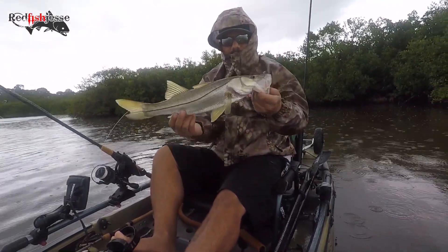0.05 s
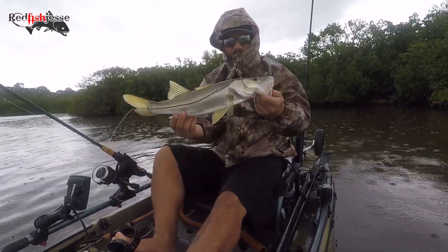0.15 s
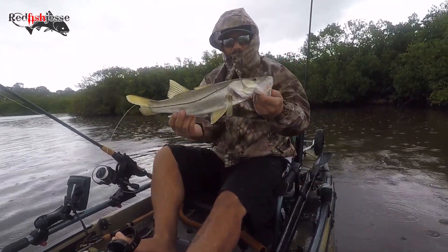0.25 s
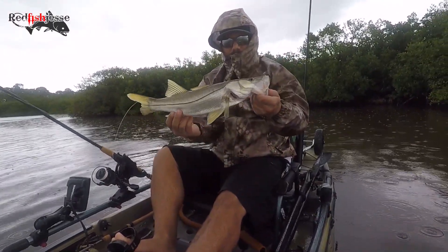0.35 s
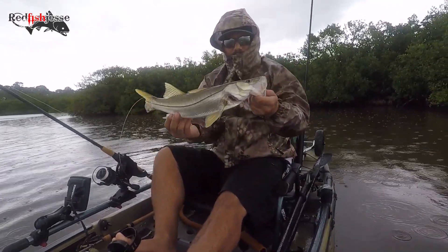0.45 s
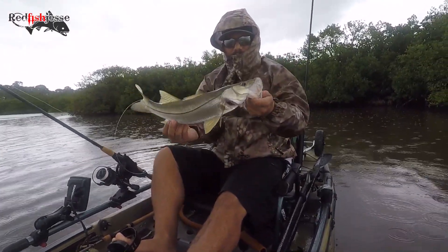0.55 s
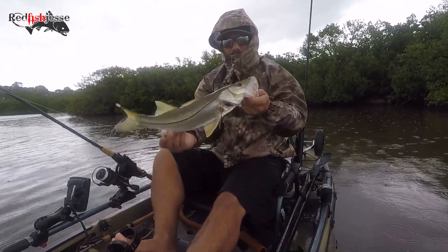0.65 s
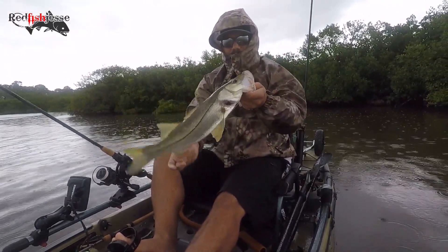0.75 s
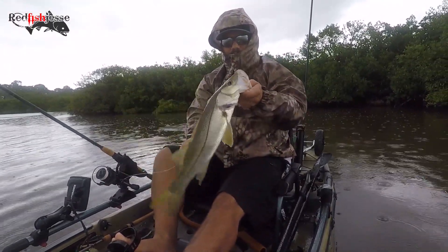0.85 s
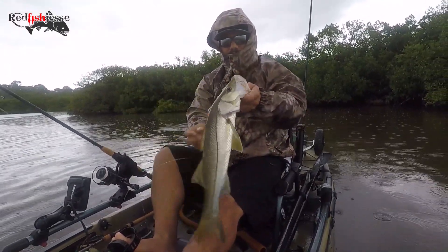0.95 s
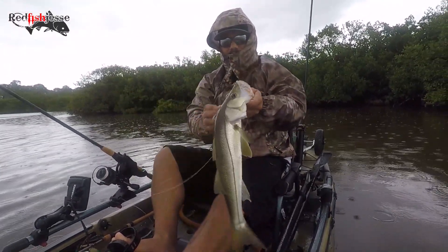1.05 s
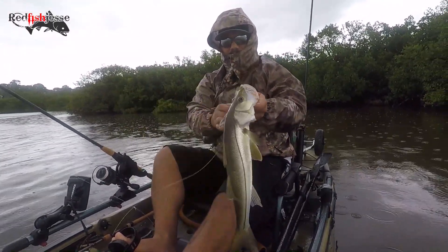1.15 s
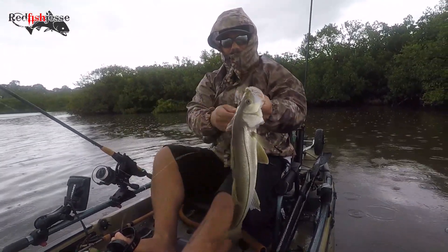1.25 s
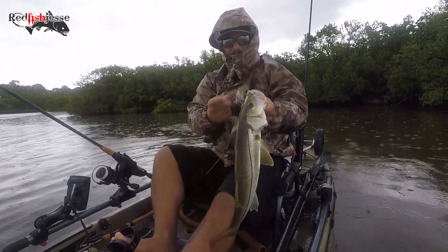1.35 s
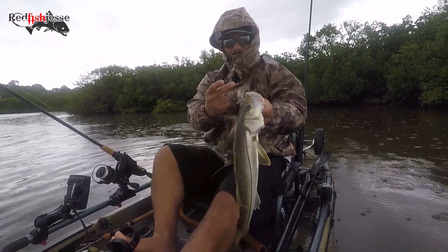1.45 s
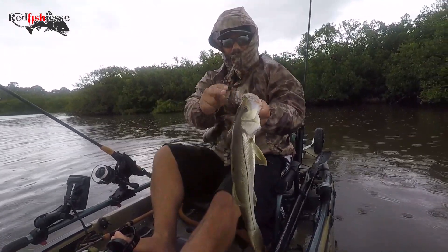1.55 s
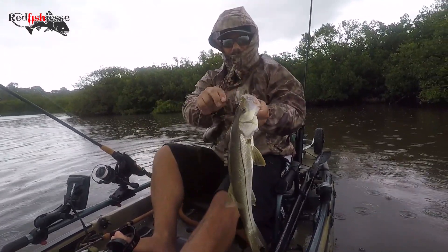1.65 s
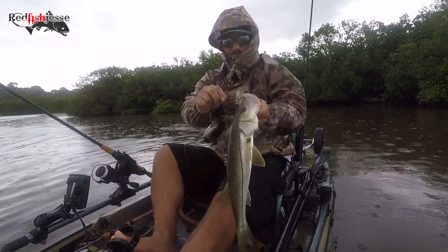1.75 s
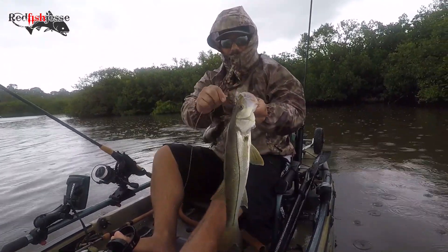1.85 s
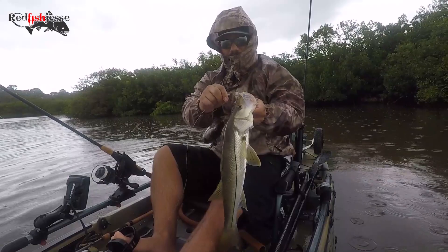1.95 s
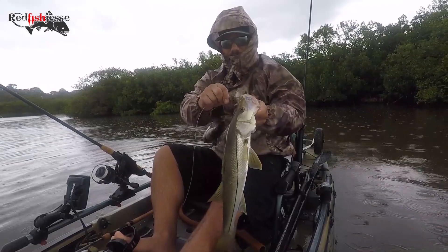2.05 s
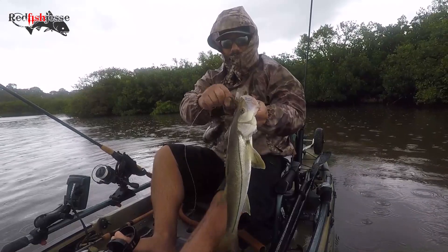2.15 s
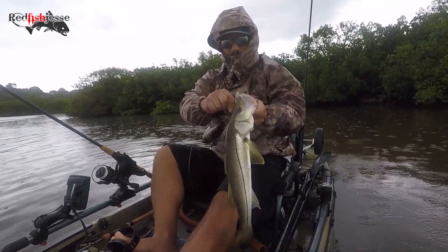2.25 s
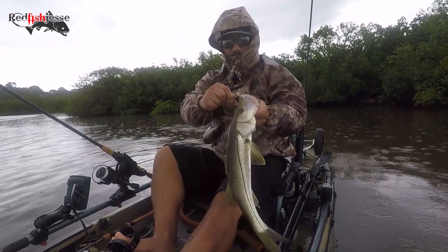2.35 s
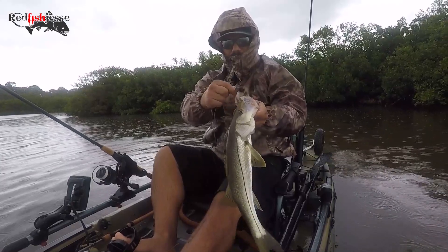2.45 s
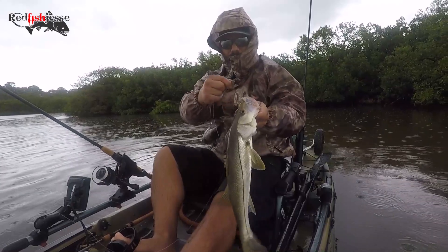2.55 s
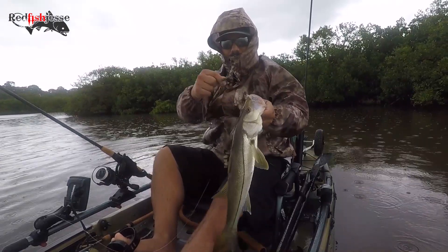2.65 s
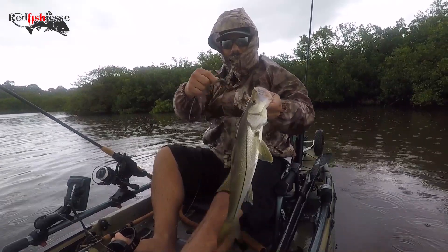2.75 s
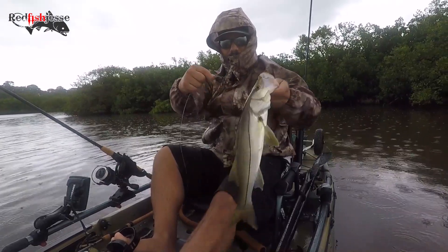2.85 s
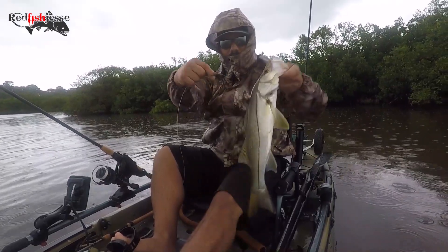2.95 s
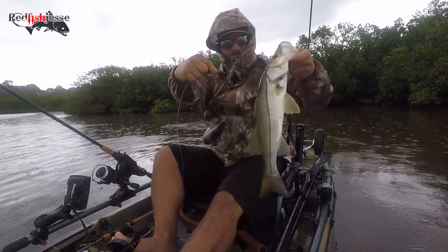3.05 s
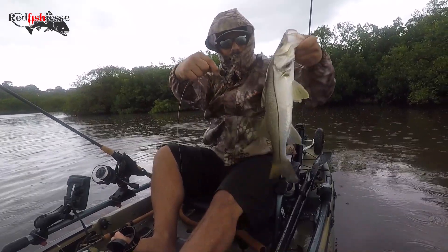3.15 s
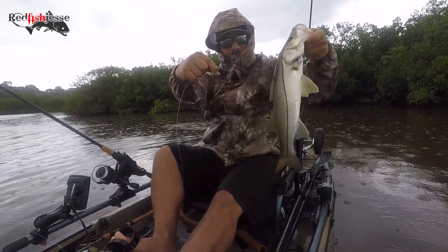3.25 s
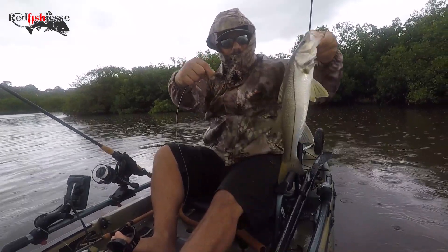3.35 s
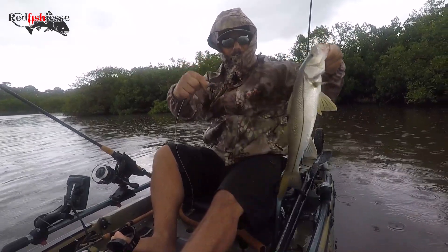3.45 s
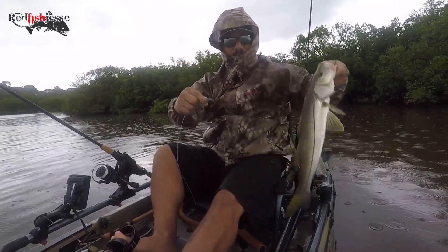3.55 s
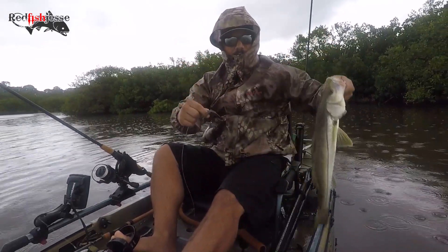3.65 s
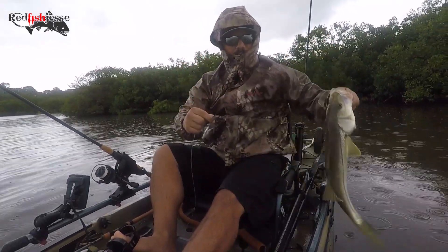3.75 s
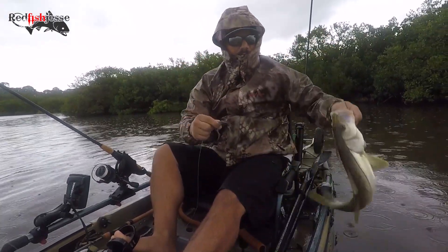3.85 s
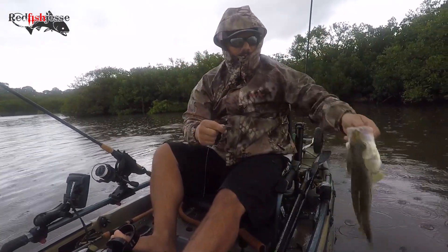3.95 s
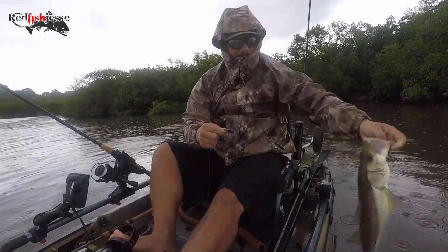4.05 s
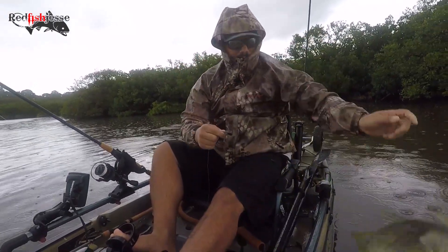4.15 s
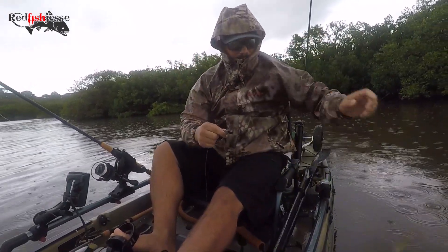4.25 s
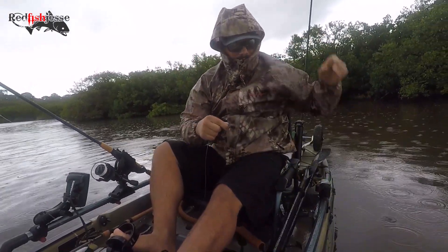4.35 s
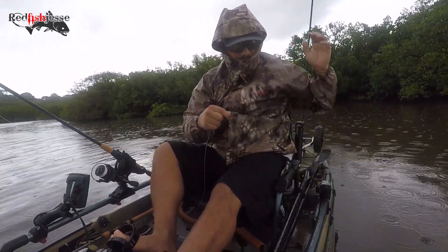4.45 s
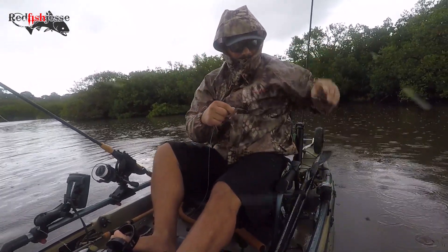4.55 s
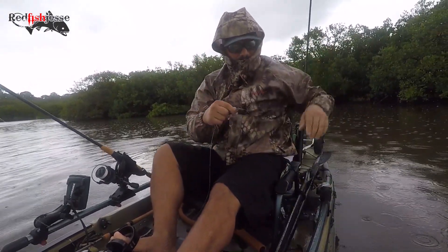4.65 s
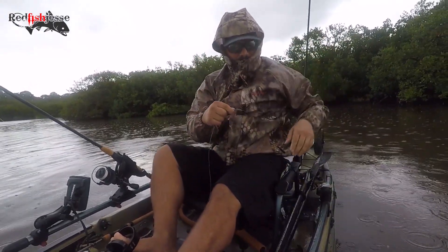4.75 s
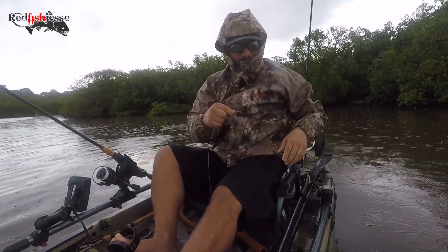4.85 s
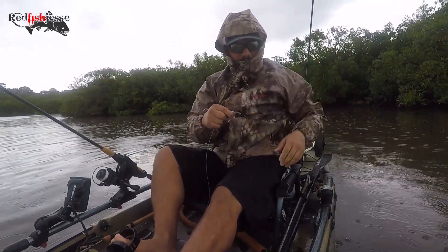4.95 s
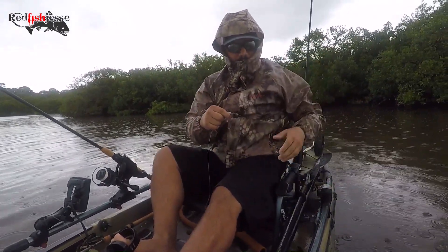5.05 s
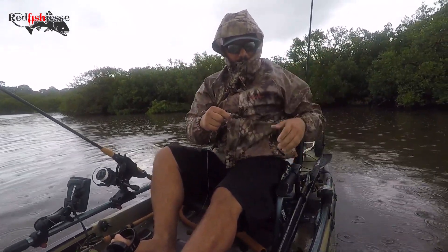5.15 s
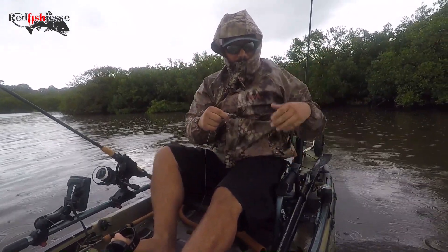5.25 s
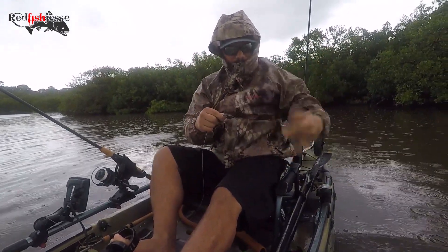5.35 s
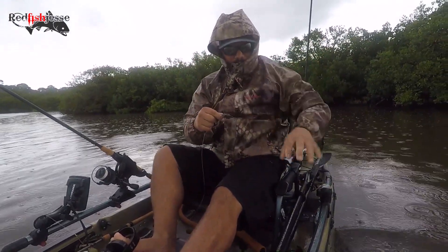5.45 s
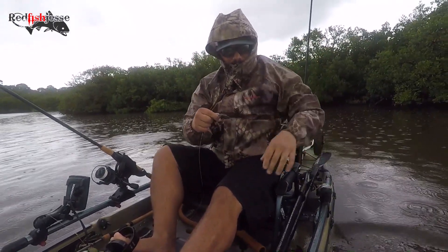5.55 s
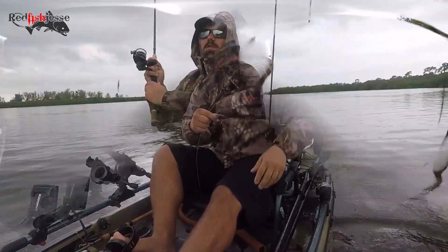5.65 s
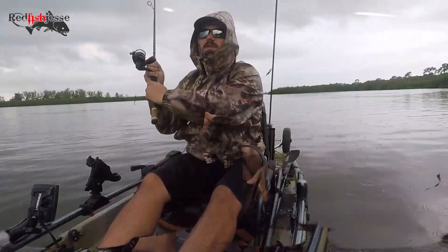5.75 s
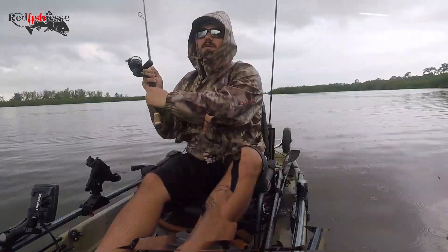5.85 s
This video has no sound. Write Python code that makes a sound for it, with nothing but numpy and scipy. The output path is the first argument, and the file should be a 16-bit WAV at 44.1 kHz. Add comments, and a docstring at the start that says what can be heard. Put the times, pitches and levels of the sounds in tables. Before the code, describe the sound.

Rainfall ticks and drums around a small boat with light knocks, then heavy thumps, a short splash, bubbling, breeze and a final clack.

```python
"""Steady rain on a lagoon, heard on a plastic kayak: wash, ticks and drops that drum modal rings from the hull.
A jacket swishes as filtered noise; knocks ring the hull modes; tackle clacks at 2 s. Near 4 s a fish is let go:
it thumps the boat, slaps the water (noise bursts), throws up spray (grains), and bubbles (climbing sines) rise.
Then the rain fades, the image narrows to the middle, a breeze (filtered noise) rumbles and tackle clacks again."""
import sys
import numpy as np
from scipy import signal
from scipy.fft import rfft, irfft
from scipy.io import wavfile

SR = 44100
rng = np.random.default_rng(int(sys.argv[2]) if len(sys.argv) > 2 else 0)


def log_audio(samples):
    """Write samples as a 16-bit WAV file to the path given in sys.argv[1]."""
    # one column per channel
    frames = np.atleast_2d(samples).T
    # limit to full scale, then quantise
    limited = np.clip(frames, -1, 1)
    pcm = np.round(limited * 32767).astype(np.int16)
    wavfile.write(sys.argv[1], SR, pcm)


N = 260583


def gain_of(db):
    """Decibels to gain."""
    return 10 ** (np.asarray(db) / 20)


def evened(x):
    """Scales to rms 1."""
    return x / np.sqrt(np.mean(x ** 2) + 1e-20)


def read(points, hz):
    """Reads a spectrum table on a log-frequency axis."""
    f, value = np.transpose(points)
    return np.interp(np.log(hz + 1), np.log(f + 1), value)


def level(curve):
    """A (time_s, db) curve as a gain for every sample."""
    return gain_of(np.interp(np.arange(N) / SR, *np.transpose(curve)))


def add(mix, start_s, sound):
    """Lays a sound into the mix at start_s."""
    part = mix[:, max(round(start_s * SR), 0):][:, :sound.shape[-1]]
    part += sound[..., :part.shape[1]]


def colour(x, spectrum):
    """Causal minimum-phase filter with the given (hz, db) response."""
    log_gain = np.log(gain_of(read(spectrum, abs(np.fft.fftfreq(4096, 1 / SR)))))
    taps = np.fft.ifft(np.exp(np.conj(signal.hilbert(log_gain)))).real
    return signal.oaconvolve(x, taps[None, :len(taps) // 2], axes=1)[:, :x.shape[1]]


def lowpass(x, order, edge_hz):
    """Butterworth low-pass."""
    return signal.sosfilt(signal.butter(order, edge_hz, fs=SR, output="sos"), x)


def ports(z, phase, same, pan):
    """Two unrelated sounds become a microphone pair: partly alike, phase-shifted, tilted in level."""
    hz = np.fft.rfftfreq(z.shape[1], 1 / SR)
    a, b = rfft(z)
    likeness = np.clip(read(same, hz), 0, .99)
    tilt = gain_of(read(pan, hz) / 2)
    right = (likeness * a + np.sqrt(1 - likeness ** 2) * b) * np.exp(-1j * read(phase, hz))
    return irfft(np.array([a * tilt, right / tilt]), z.shape[1])


def sway(rate_hz, depth_db):
    """A gain that wanders between random values drawn rate_hz times a second."""
    t = np.arange(N) / SR
    knots = rng.standard_normal(1024)
    return gain_of(depth_db * np.interp(t * rate_hz, np.arange(len(knots)), knots))


def swell(t, crest_s, rise_s, fall_s):
    """An envelope that grows to a crest and dies away, both exponentially."""
    return np.exp(-np.maximum((crest_s - t) / rise_s, (t - crest_s) / fall_s))


def impacts(per_s, spread_db):
    """A random train of impulses, mostly small and a few large."""
    sizes = gain_of(spread_db * np.minimum(rng.exponential(1, N), 4))
    return sizes * (rng.random(N) < per_s / SR)


def strewn(per_s, spread_db, grain):
    """Repeats a stereo grain at random impacts."""
    return signal.oaconvolve(impacts(per_s, spread_db)[None], grain, axes=1)[:, :N]


def patter(per_s, spread_db, low_hz, high_hz, cycles, count=24):
    """Drops of many sizes: each is a short fizzing tick around its own pitch."""
    t, out = np.arange(1024) / SR, np.zeros((2, N))
    for hz in np.geomspace(low_hz, high_hz, count):
        burst = rng.standard_normal((2, len(t))) * np.exp(-t / 0.00098)
        ring = np.sin(2 * np.pi * hz * t) * np.exp(-t * hz / cycles)
        grain = evened(signal.fftconvolve(burst, ring[None], axes=1)[:, :len(t)])
        out += np.sqrt(hz) * strewn(per_s / count, spread_db, grain)
    return out


def plink(hz, cycles, rise):
    """Trapped air rings as a decaying sine that climbs while it nears the surface."""
    t = np.arange(SR // 15) / SR
    age = t * hz / cycles
    turns = np.cumsum(hz * (1 + rise * np.minimum(age, 5))) / SR
    ring = np.sin(2 * np.pi * (turns + rng.random((2, 1))))
    return ring * np.exp(-age) * (1 - np.exp(-t * hz))


def bubbles(per_s, spread_db, low_hz, high_hz, cycles, rise, count=24):
    """A random swarm of bubbles of many sizes."""
    sizes_hz = np.geomspace(low_hz, high_hz, count)
    return evened(sum(strewn(per_s / count, spread_db, plink(hz, cycles, rise)) for hz in sizes_hz))


# rain strength: time_s, gain_db
RAIN_LEVEL = [(0, -0.5), (2.3, -0.5), (4.1, 1.64), (4.6, -5.5), (4.9, -5), (5.1, -22), (5.3, -6.5),
              (5.91, -28)]
# filters of far wash and near drops: freq_hz, relative_db
WASH_COLOUR = [(60, -104), (130, -19), (350, 21.5), (560, 8), (900, -14), (1500, -4.5), (2100, -9.5),
               (3000, -11.5), (4400, -6), (6000, -3.5), (7700, -9), (10000, -14.5), (12500, -20),
               (15000, -42)]
DROP_COLOUR = [(200, -40.5), (600, 8), (1100, 2.5), (2000, -8), (2900, 0), (4300, -11.5), (5900, 0),
               (7700, -10.5), (10000, -10), (12500, -28), (15000, -25)]
# rain at the two microphone ports: freq_hz, left_lead_rad | freq_hz, likeness | freq_hz, left_minus_right_db
RAIN_LEAD = [(100, -5), (500, -2.5), (1500, -4), (2200, -5), (3300, -5), (4600, -7.5), (5400, -8),
             (7400, -8.5), (10000, -11.5), (15000, -7.5)]
RAIN_LIKENESS = [(100, 0.25), (350, 0.93), (700, 0.56), (1500, 0.31), (2200, 0.74), (3300, 1), (6000, 0.95),
                 (9000, 0.5), (15000, .1)]
RAIN_BALANCE = [(200, -0.5), (700, -1), (1400, 0.5), (3000, -1), (6000, 0.5), (8500, -7.5), (15000, -4.5)]


def rain():
    """A far wash, nearer ticks and plinks on the water, and drops drumming on the hull."""
    wash = gain_of(-41.5) * evened(colour(rng.standard_normal((2, N)), WASH_COLOUR))
    wash *= sway(rate_hz=70, depth_db=1)
    near = patter(per_s=3200, spread_db=2.9, low_hz=600, high_hz=13000, cycles=2.2)
    drops = gain_of(-45.5) * evened(colour(near, DROP_COLOUR))
    plinks = bubbles(per_s=69, spread_db=0.0, low_hz=1774, high_hz=4430, cycles=17, rise=0.038)
    plinks *= gain_of(-63.0) * sway(rate_hz=9.2, depth_db=6.5)
    # one independent train, each with its own ring, per entry of the mode table
    drumming = sum(strewn(22, 1.0, hull_ring(hard_hz=311.4, twist=0.6)) for _ in HULL_MODES)
    on_water = ports(wash + drops + plinks, RAIN_LEAD, RAIN_LIKENESS, RAIN_BALANCE)
    return level(RAIN_LEVEL) * (on_water + gain_of(-34.0) * evened(drumming))


# largest close drops on boat and gear: start_s, level_db, pitch_hz, left_minus_right_db
LARGE_DROPS = [(0.316, -38.5, 3230, -4), (0.372, -40, 9100, -9), (0.687, -36, 5340, -1),
               (0.8, -46, 3870, 8), (1.021, -41.5, 2600, 0), (1.1, -48, 1140, 6), (1.13, -42, 4300, -2),
               (1.293, -40, 5840, 0), (1.633, -36, 5860, -8), (1.662, -39.5, 825, 0),
               (1.842, -38.5, 3720, 2), (2.047, -40, 2750, -5), (2.101, -40.5, 2800, -5),
               (2.145, -40.5, 3300, 2), (2.178, -34.5, 2510, -7), (2.188, -39, 3650, -3),
               (2.304, -45.5, 1120, -1), (2.332, -40, 6100, -14), (2.576, -41.5, 3050, -1),
               (2.689, -42, 2800, -3), (2.844, -41.5, 906, 1), (2.873, -41, 870, -3),
               (3.192, -35.5, 2470, 0), (3.346, -39, 2960, 1), (3.845, -40, 6700, -9),
               (4.758, -36.5, 6560, -9), (4.963, -38, 4100, 2), (5.041, -37.5, 4080, 3)]
TICKS_PER_S, TICK_DB, TICK_SPREAD_DB, TICK_LOW_HZ, TICK_HIGH_HZ = 5, -43, 1.5, 2000, 5200  # small drops


def ticks(pan_db=-4):
    """Close drops on the boat: a few stand out; smaller ones fall at random, scaled by the rain strength."""
    large, small = np.zeros((2, 2, N))
    for start_s, level_db, pitch_hz, balance_db in LARGE_DROPS:
        add(large, start_s, tick(level_db, pitch_hz, balance_db))
    for k in range(round(TICKS_PER_S * N / SR)):
        pitch_hz = TICK_LOW_HZ * (TICK_HIGH_HZ / TICK_LOW_HZ) ** rng.random()
        start_s = (k + rng.random()) / TICKS_PER_S
        level_db = TICK_DB + TICK_SPREAD_DB * rng.standard_normal()
        add(small, start_s, tick(level_db, pitch_hz, pan_db))
    return large + level(RAIN_LEVEL) * small


def tick(level_db, hz, pan_db, cycles=5.1, crack_db=-2, lift_db=9.0):
    """A close drop: a sharp noise tick and a brief ring around one pitch, the ring 1 rad later on the left."""
    t = np.arange(SR // 30) / SR
    crack_colour = [(hz / 6, -20), (hz / 2, -7), (hz, 0), (hz * 1.5, -9), (hz * 4, -34)]
    crack = colour(rng.standard_normal((2, len(t))) * np.exp(-t / 0.0026), crack_colour)
    ring = np.sin(2 * np.pi * hz * t - np.array([[1], [0]])) * np.exp(-t * hz / cycles)
    hit = evened(ring) + gain_of(crack_db) * evened(crack)
    return gain_of(level_db + lift_db + np.array([[pan_db], [-pan_db]]) / 2) * hit / abs(hit).max()


# knocks on the hull: start_s, level_db, hardness_hz
HULL_KNOCKS = [(.569, -17, 1680), (0.909, -17, 600), (.974, -12, 750), (1.0, -15.5, 473),
               (1.185, -17.5, 1600), (1.243, -15, 1530), (1.993, -5, 520), (2.25, -15.5, 420),
               (2.393, -17.5, 700), (3.164, -15, 350), (3.536, -10.5, 450), (3.548, -10.5, 296),
               (3.615, -16, 720), (3.796, -15.5, 597), (3.8638, -3, 1730), (3.953, -7, 377),
               (3.962, -7, 347), (4.113, -3, 635), (4.121, -7, 222), (4.154, 0, 740), (4.162, -1, 320),
               (4.179, -4.5, 220), (4.231, -2, 190), (4.258, -11, 200), (4.403, -7, 400), (4.42, -5, 500),
               (4.449, -1.5, 477), (4.467, -8, 356), (4.479, -4, 264), (4.529, -4, 380),
               (4.934, -17.5, 220)]


def knocks():
    """Feet, the fish and small waves knock on the hull."""
    out = np.zeros((2, N))
    for start_s, level_db, hard_hz in HULL_KNOCKS:
        add(out, start_s, blow(level_db, hard_hz))
    return out


SHUFFLES_PER_S, SHUFFLE_DB, SHUFFLE_HZ, SHUFFLE_END_S = 3.8, -33, 520, 1.7


def shuffling():
    """Light hull bumps at uneven moments while the fish is turned upright."""
    out = np.zeros((2, N))
    for k in range(round(SHUFFLES_PER_S * SHUFFLE_END_S)):
        add(out, (k + rng.random()) / SHUFFLES_PER_S, blow(SHUFFLE_DB, SHUFFLE_HZ))
    return out


def blow(level_db, hard_hz):
    """One blow on the hull, scaled by its peak."""
    ring = hull_ring(hard_hz)
    return gain_of(level_db) * ring / abs(ring).max()


# modes of the hull: nominal_hz, level_db, t60_s
HULL_MODES = [(151.8, -5, 0.21), (185, 1.5, 0.062), (217.4, 0.5, 0.071), (274.6, -7.5, 0.1),
              (336, 4.5, 0.047), (385.4, 3, 0.031), (473, -4.5, 0.085), (645, 3, 0.038), (700, -4, 0.043),
              (980, -1, 0.017), (1193, 6, 0.026), (1500, -5, 0.025), (1790, 1, 0.034)]
BEND_LAG_S = 0.0023  # bending waves: lag of a 300 Hz ring; higher ones run faster


def hull_ring(hard_hz, scatter_db=0.56, twist=0.21, loose_hz=190, thud_db=-4):
    """Hull modes plus a thud; a soft blow omits high modes. The mount rocks the ports in opposite senses."""
    t = np.arange(SR // 5) / SR
    hz, db, t60_s = np.transpose(HULL_MODES)[:, :, None]
    size, detune, *skew = rng.standard_normal((4, len(HULL_MODES), 1))
    age = np.maximum(t - BEND_LAG_S * np.sqrt(300 / hz), 0)
    modes = gain_of(db + scatter_db * size - 60 * age / t60_s) / np.sqrt(1 + (hz / hard_hz) ** 9)
    modes *= 1 - np.exp(-(age * np.minimum(hard_hz, 1200)) ** 2)
    phase = 2 * np.pi * hz * (1 + hz / (hz + 1500) * .05 * detune) * age
    slack = twist * (1 + (loose_hz / hz) ** 2)  # low modes reach the two ports less alike
    ring = np.array([(modes * np.sin(phase + slack * s)).sum(0) for s in skew])
    # the many damped modes in between blur into a short thud
    thud = evened(lowpass(rng.standard_normal(len(t)), 6, np.clip(hard_hz, 100, 1800)))
    thud = thud * np.exp(-t / 0.0062)
    onset = 1 - np.exp(-(t / BEND_LAG_S) ** 2)
    return (ring + gain_of(thud_db) * thud * onset) * [[1], [-1]] * gain_of([[.4], [-.4]])


# filter of the spray: freq_hz, relative_db
SPRAY_COLOUR = [(100, -4), (300, 17), (600, 7), (1300, -2.5), (2000, -1), (2800, -3), (4200, -2.5),
                (6000, 7.5), (7500, -6.5), (9500, -5.5), (13000, -12), (15500, -51)]
# slaps of the fish and of falling water: start_s, level_db, upper_edge_hz
WATER_SLAPS = [(4.2087, -15, 1700), (4.272, -18, 1700), (4.3069, -2.5, 13000), (4.3087, -6, 5000),
               (4.3499, -15, 1490), (4.372, -17, 3020), (4.422, -14, 2400), (4.4496, -13, 1500),
               (4.453, -12.5, 9000), (4.5235, -23, 1500), (4.55, -19, 1400)]
# splash at the two ports: freq_hz, left_lead_rad | freq_hz, left_minus_right_db
SPLASH_LEAD = [(100, -2.5), (1000, -2), (1500, -5.5), (2200, -4), (3300, -7.5), (4600, -8.5), (6000, -9),
               (9000, -8), (15000, -31.5)]
SPLASH_BALANCE = [(200, -1.5), (700, -2), (1400, -14.5), (3000, -6.5), (6000, 0), (8500, -9),
                  (15000, -10.5)]


def splash():
    """Slaps on the surface, sheets of falling droplets, and a low heave of water."""
    # heavy and fine droplets land in separate clumps
    coarse = patter(per_s=2400, spread_db=3.2, low_hz=500, high_hz=3200, cycles=4)
    coarse *= sway(rate_hz=130, depth_db=1.3)
    fine = patter(per_s=5500, spread_db=3.5, low_hz=2600, high_hz=14000, cycles=1.8)
    fine *= sway(rate_hz=170, depth_db=1.4)
    spray = spray_flow() * evened(colour(gain_of(4.5) * coarse + fine, SPRAY_COLOUR))
    slaps = np.zeros((2, N))
    for start_s, level_db, top_hz in WATER_SLAPS:
        add(slaps, start_s, slap(level_db, top_hz))
    heave_colour = [(20, 5.0), (70, 4.5), (160, -4.0), (400, -21.0), (900, -48), (6000, -33), (15000, -44.5)]
    heave = evened(colour(rng.standard_normal((2, N)), heave_colour))
    heave *= level([(3.95, -79), (4.12, -29), (4.2, -57), (4.35, -29.5),
                    (4.5, -27.5), (4.65, -28), (4.9, -37), (5.2, -43)])
    likeness = [(100, 0.77), (300, 0.88), (2500, 0.24), (7000, 0.98), (15000, 0.24)]
    return ports(spray + slaps + heave, SPLASH_LEAD, likeness, SPLASH_BALANCE)


# short flicks of spray: start_s, level_db, hold_s
SPRAY_FLICKS = [(4.163, -35, 0.011), (4.211, -28, 0.0097), (4.231, -31.5, 0.011), (4.264, -28.5, 0.019),
                (4.302, -33, 0.019), (4.347, -33, 0.0031), (4.441, -36, 0.0077), (4.912, -37.5, 0.008)]
FLICK_RISE_S, FLICK_FALL_S = 0.0028, 0.0035
# surges: the plunge, the water falling back, the last wash: crest_s, level_db, rise_s, fall_s
SPRAY_SURGES = [(4.39, -26, 0.039, 0.042), (4.428, -27, 0.026, 0.01), (4.549, -30, 0.041, 0.055),
                (4.85, -38.5, 0.065, 0.17)]


def spray_flow():
    """How much water is in the air: quick flicks of the tail, then rounded surges that drain away."""
    t, flow = np.arange(N) / SR, np.zeros(N)
    for start_s, level_db, hold_s in SPRAY_FLICKS:
        rise = np.clip((t - start_s) / FLICK_RISE_S, 0, 1)
        fall = np.exp(-np.maximum(t - start_s - hold_s, 0) / FLICK_FALL_S)
        flow += gain_of(level_db) * rise * fall
    for crest_s, level_db, rise_s, fall_s in SPRAY_SURGES:
        decay = np.where(t < crest_s, ((crest_s - t) / rise_s) ** 2, (t - crest_s) / fall_s)
        flow += gain_of(level_db) * np.exp(-decay)
    return flow


def slap(level_db, top_hz):
    """Water is struck: a noise burst, bright from a fin, dull from a falling lump of water."""
    t = np.arange(SR // 40) / SR
    crack_colour = [(300, -7.5), (700, -1.0), (1400, -6), (2600, -10), (4200, -7.0),
                    (6000, -6), (7500, -10.0), (9500, -9.5), (15000, -28)]
    crack = colour(rng.standard_normal((2, len(t))) * np.exp(-t / 0.0018), crack_colour)
    crack = lowpass(crack, 2, min(top_hz, SR / 3))
    return gain_of(level_db) * crack / abs(crack).max()


# clouds of bubbles: crest_s, level_db
BUBBLE_CLOUDS = [(.45, -46.5), (1.0, -50.5), (1.22, -50), (1.51, -51.5), (2.19, -56), (3.06, -50.5),
                 (4.39, -30), (4.43, -36), (4.485, -45.5), (4.555, -38), (4.62, -55), (4.84, -46.5),
                 (4.88, -50.5), (4.92, -43), (4.975, -54), (5.14, -49), (5.23, -50.5)]
# largest single bubbles: start_s, level_db, starting_pitch_hz
LARGE_BUBBLES = [(.408, -31, 2550), (0.436, -33, 1130), (.975, -37, 1500), (1.498, -36, 2600),
                 (1.534, -36, 1770), (2.409, -28.5, 2360), (4.469, -27, 1320), (4.551, -25, 900),
                 (4.63, -36, 1700), (4.686, -39, 1650), (4.702, -26, 2650), (4.717, -38, 2150),
                 (4.726, -32, 2680), (4.734, -33, 2730), (4.78, -32, 2570), (4.80, -34, 2030),
                 (4.825, -30.5, 900), (4.918, -23, 2630), (4.966, -31, 1980), (4.983, -33, 1810),
                 (5.012, -44, 1410), (5.096, -36.5, 880), (5.121, -31.5, 1420), (5.184, -32.5, 732),
                 (5.219, -35, 1550)]
FROTH_RISE_S, FROTH_FALL_S = 0.023, 0.026
TRAIL_CREST_S, TRAIL_DB, TRAIL_RISE_S, TRAIL_FALL_S = 4.78, -47.5, 0.18, 0.65


def froth():
    """Bubble clouds gurgle beside the boat; a few large ones stand out, and a faint simmer trails the dive."""
    t = np.arange(N) / SR
    clouds = sum(gain_of(db) * swell(t, crest_s, FROTH_RISE_S, FROTH_FALL_S) for crest_s, db in BUBBLE_CLOUDS)
    out = clouds * bubbles(per_s=800, spread_db=2.4, low_hz=800, high_hz=3100, cycles=6, rise=.04)[:1]
    for start_s, level_db, pitch_hz in LARGE_BUBBLES:
        add(out, start_s, gain_of(level_db) * plink(pitch_hz, cycles=4.2, rise=0.039)[:1])
    simmer = bubbles(per_s=190, spread_db=2.3, low_hz=750, high_hz=3000, cycles=7, rise=.025)[:1]
    out += gain_of(TRAIL_DB) * swell(t, TRAIL_CREST_S, TRAIL_RISE_S, TRAIL_FALL_S) * simmer
    return out * gain_of([[-1.5], [1.5]])


# pockets of air closing in the water: start_s, level_db, starting_pitch_hz, glide_octaves_per_s
AIR_POCKETS = [(4.71, -46.5, 760, -14.5), (4.828, -58, 502, 15.5), (5.09, -47, 1028, -19.5)]
GULP_S, GULP_ROUGH_DB = 0.11, 4.5


def gulps():
    """Pockets of air in the swirl ring unevenly and slide in pitch."""
    out, t = np.zeros((1, N)), np.arange(round(GULP_S * SR)) / SR
    envelope = np.sin(np.pi * np.sqrt(t / GULP_S)) ** 2
    for start_s, level_db, pitch_hz, glide in AIR_POCKETS:
        turns = np.cumsum(pitch_hz * 2 ** (glide * t)) / SR
        add(out, start_s, gain_of(level_db) * np.sin(2 * np.pi * turns) * envelope)
    return out * sway(rate_hz=170, depth_db=GULP_ROUGH_DB)


def sleeve(start_s=.22, length_s=0.29):
    """The wet jacket swishes as the fish is turned: one swell of filtered noise."""
    out, count = np.zeros((2, N)), round(length_s * SR)
    swish_colour = [(3000, -13.5), (5200, -11), (5900, 1.5), (6700, -13),
                    (8000, -22), (9000, -9.0), (10500, -30), (15000, -45)]
    swish = colour(rng.standard_normal((2, count)), swish_colour)
    add(out, start_s, gain_of(-44.5) * evened(swish) * np.hanning(count))
    return ports(out, RAIN_LEAD, RAIN_LIKENESS, RAIN_BALANCE)


# modes of the tackle: freq_hz, level_db, t60_s
TACKLE_MODES = [(72, 13, 0.04), (706, 0, 0.036), (1120, -4, 0.0059), (1318, -2, 0.05), (1625, 4, 0.019),
                (1770, 8, 0.017), (2390, -4, 0.02), (2810, -3, 0.01), (3300, -3, 0.0072),
                (4000, 9.5, 0.009), (4270, -1, 0.005)]
# clacks of loose tackle: start_s, peak_db, ring_lower_edge_hz, upper_edge_hz, right_lead_rad
TACKLE_CLACKS = [(1.999, -16, 800, 1800, 2.4), (5.6108, -23, 900, 2000, 0), (5.6185, -22, 900, 1900, 0),
                 (5.6221, -11, 40, 3900, 0)]
CLACK_RISE_S = 0.0008


def clack(crack_db=-2):
    """Hard plastic tackle chatters and settles: damped modes plus a dry noise crack."""
    out, t = np.zeros((2, N)), np.arange(SR // 10) / SR
    crack_colour = [(300, 4.5), (900, -5.5), (1500, 1), (2400, 1.5),
                    (4000, 4), (5500, -7), (6600, 4), (9000, -37)]
    for start_s, peak_db, low_hz, top_hz, lead_rad in TACKLE_CLACKS:
        ring = np.zeros(len(t))
        for hz, mode_db, t60_s in TACKLE_MODES:
            strength = gain_of(mode_db - 60 * t / t60_s) / (1 + (low_hz / hz) ** 2)
            ring += strength * rng.choice([-1, 1]) * np.sin(2 * np.pi * hz * t)
        crack = colour(rng.standard_normal((1, len(t))) * np.exp(-t / 0.0031), crack_colour)
        hit = evened(ring) + gain_of(crack_db) * evened(crack)
        hit = lowpass(hit * np.minimum(t / CLACK_RISE_S, 1), 4, min(top_hz, SR / 3))
        pair = (signal.hilbert(hit) * np.exp(1j * lead_rad * np.array([[0], [1]]))).real
        add(out, start_s, gain_of(peak_db) * pair / abs(pair).max())
    return out


# breeze dies away, then returns: time_s, level_db
BREEZE_LEVEL = [(0, -41), (.75, -53.5), (2.4, -59.5), (3.9, -59), (4.02, -34), (4.55, -42.5), (4.75, -40.5),
                (5.15, -29.5), (5.91, -30)]
# filters of breeze and open water: freq_hz, relative_db
RUMBLE_COLOUR = [(20, -3), (45, -2), (80, 1.5), (130, 3), (200, -8.5), (320, -14), (550, -26.5),
                 (1000, -54), (2000, -75)]
WATER_COLOUR = [(200, -0.5), (500, 6), (1000, 0.5), (1700, -0.5), (2200, -2), (2900, 1), (3600, -12),
                (4500, -6), (6000, -8.5), (7300, -15), (9000, -7.5), (11500, -17.5), (13500, -19),
                (15500, -30)]
GUST_S, GUST_DB, GUST_RISE_S, GUST_FALL_S = 4.22, -18.5, 0.025, 0.023  # one buffet as the fish drops


def breeze():
    """Wind rumbles at the microphones over the soft hiss of open water, all in the middle."""
    rumble = evened(colour(rng.standard_normal((1, N)), RUMBLE_COLOUR))
    deep = lowpass(rumble, 2, 50)
    gust = gain_of(GUST_DB) * swell(np.arange(N) / SR, GUST_S, GUST_RISE_S, GUST_FALL_S)
    speed = level(BREEZE_LEVEL) + gust
    reach = np.minimum(speed / gain_of(-22.0), 1) ** 0.17  # slower air favours the deepest eddies
    wind = gain_of(-0.5) * speed * (reach * rumble + (1 - reach) * gain_of(-3.0) * deep)
    hiss = evened(colour(rng.standard_normal((1, N)), WATER_COLOUR)) * sway(rate_hz=2.93, depth_db=-1.5)
    return wind + hiss * level([(3.9, -90), (4.4, -64), (5.05, -53), (5.91, -47.5)])


def scene():
    """Everything around the boat; the mount passes little below the lowest hull mode."""
    mount = signal.cheby1(7, .5, 129, "high", fs=SR, output="sos")
    boat = signal.sosfilt(mount, rain() + knocks() + shuffling())
    return boat + ticks() + sleeve() + splash() + froth() + gulps() + breeze() + clack()


# width of the stereo image: time_s, side_gain_db
IMAGE_WIDTH = [(0, -1), (4.6, -0.5), (4.9, -5), (5.1, -14), (5.3, -30), (5.91, -50)]
EDGE_HZ = 15600


def record(dry):
    """The image narrows towards mono, clips at full scale and is band-limited."""
    mid = dry.mean(0)
    narrowed = np.clip(mid + level(IMAGE_WIDTH) * (dry - mid), -1, 1)
    band = signal.firwin(511, EDGE_HZ, window=("kaiser", 9), fs=SR)
    return signal.oaconvolve(narrowed, band[None], "same")


dry = scene()
out = record(dry)
log_audio(out)
```